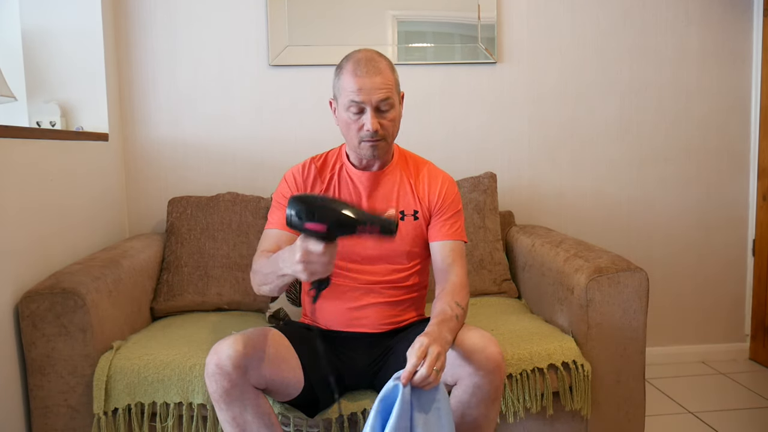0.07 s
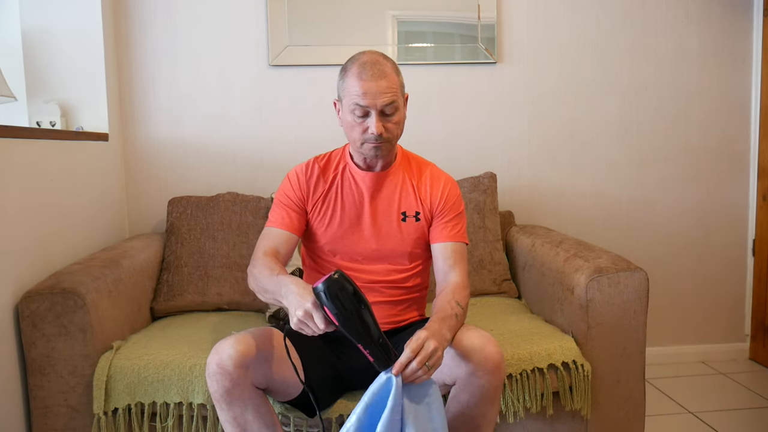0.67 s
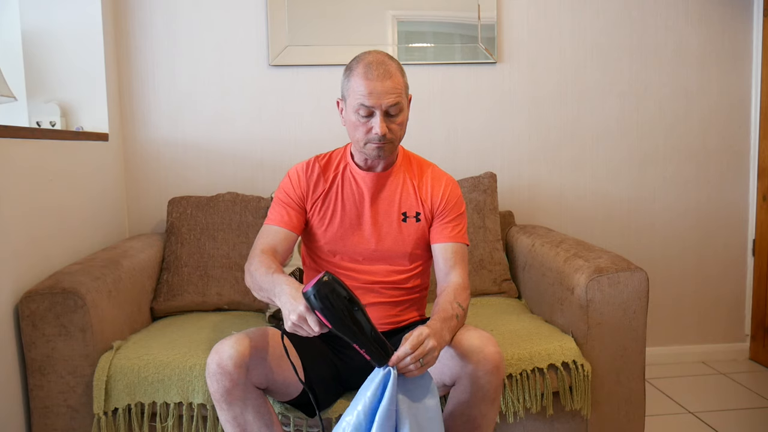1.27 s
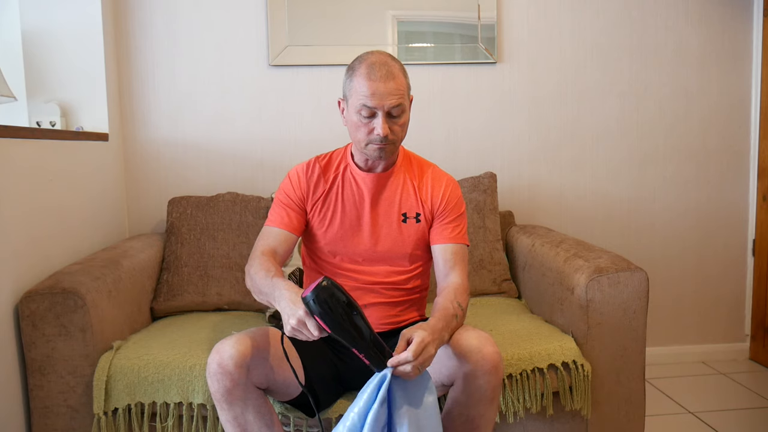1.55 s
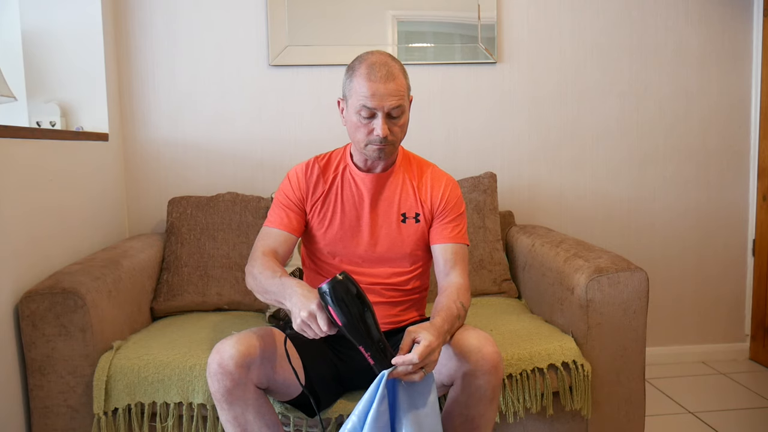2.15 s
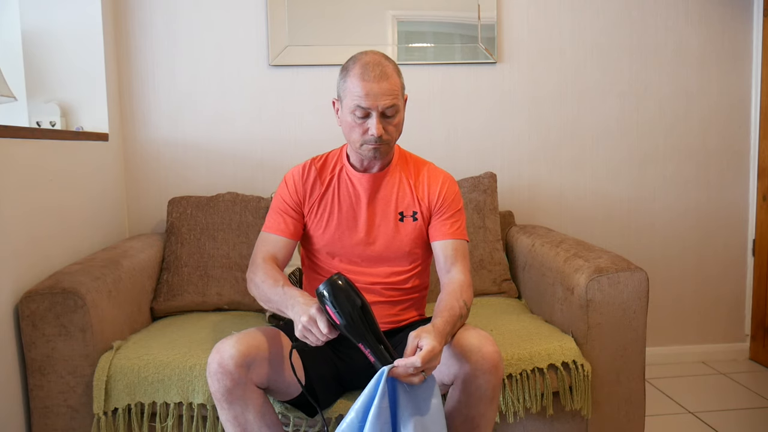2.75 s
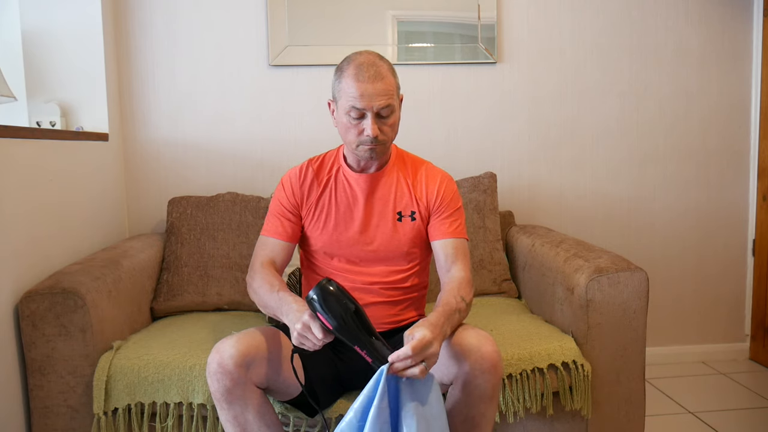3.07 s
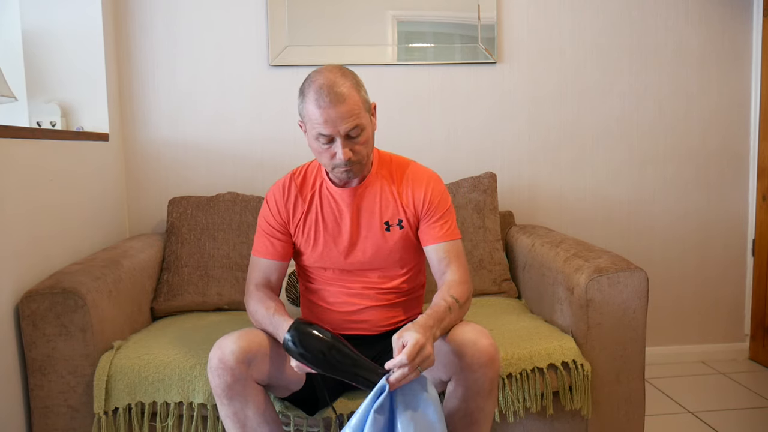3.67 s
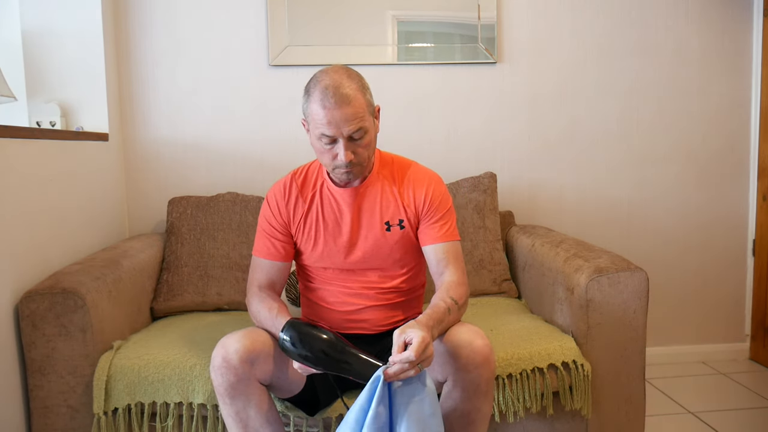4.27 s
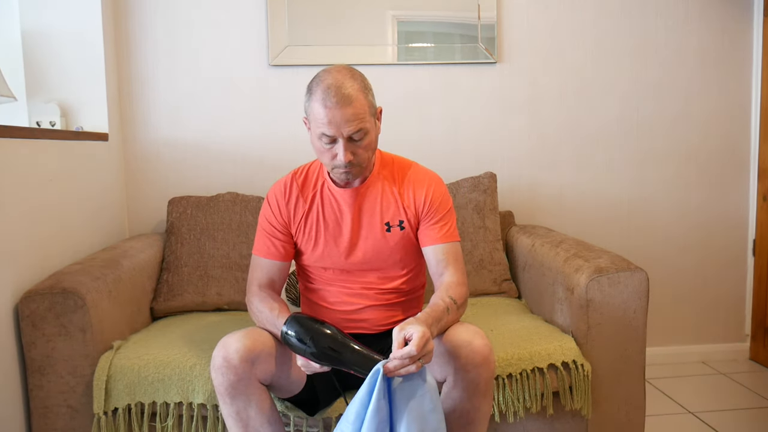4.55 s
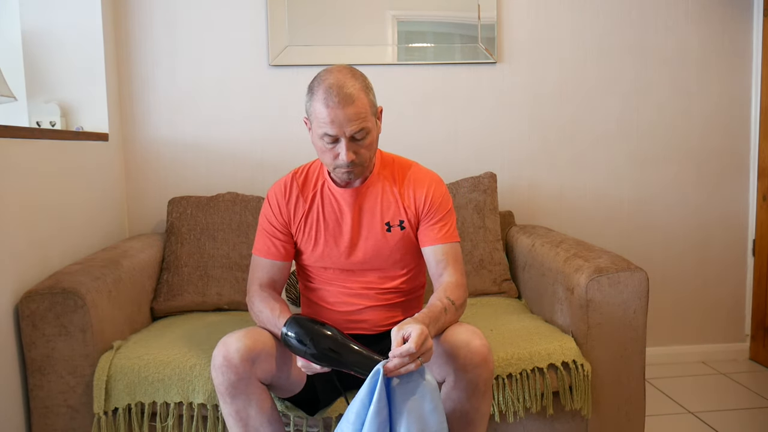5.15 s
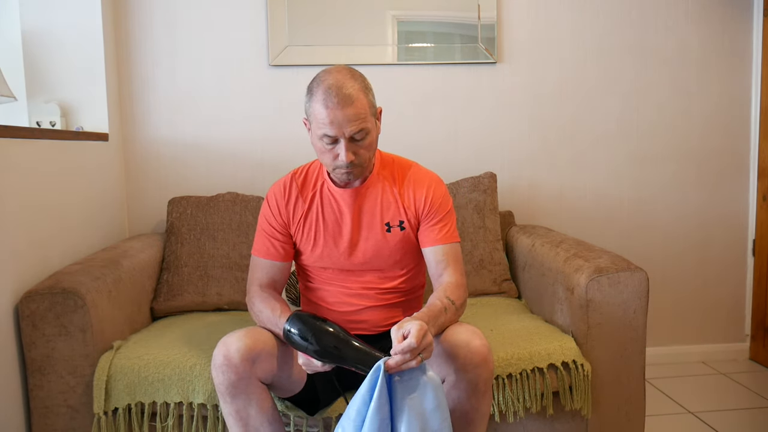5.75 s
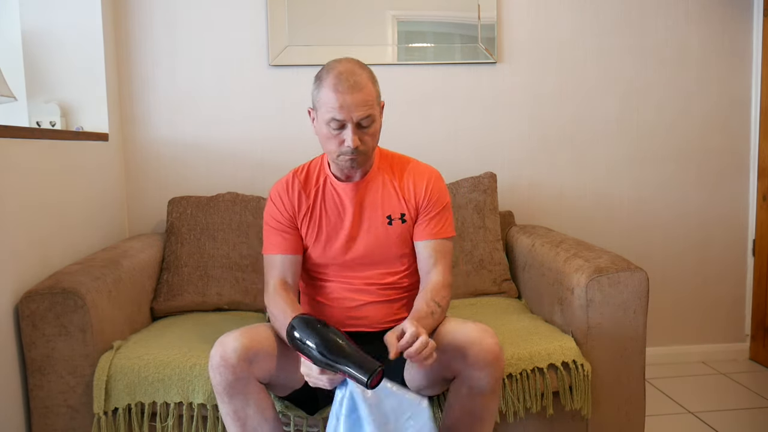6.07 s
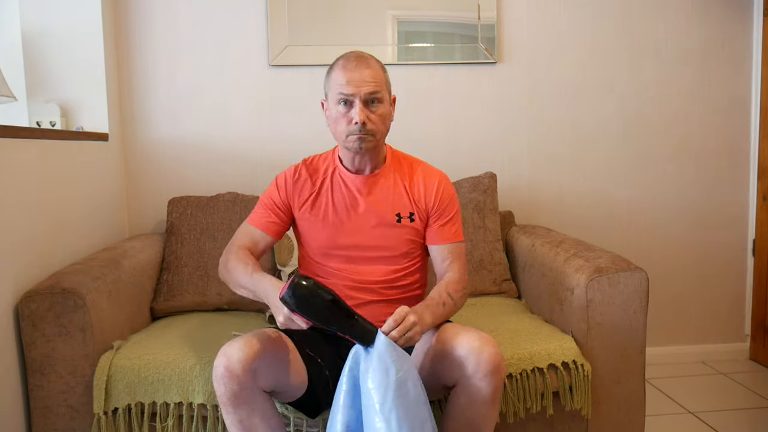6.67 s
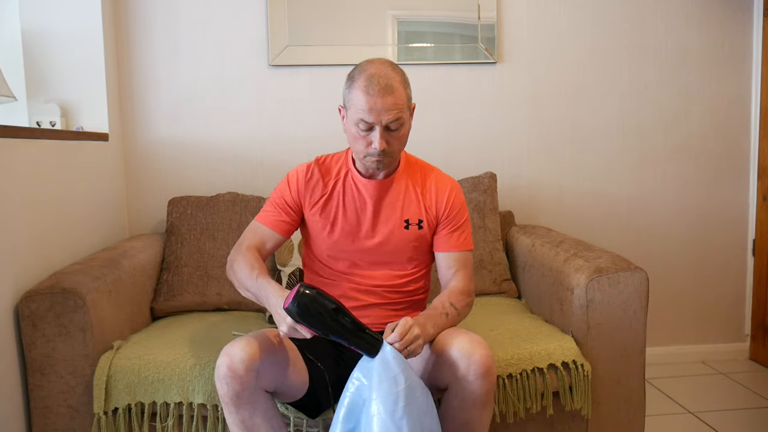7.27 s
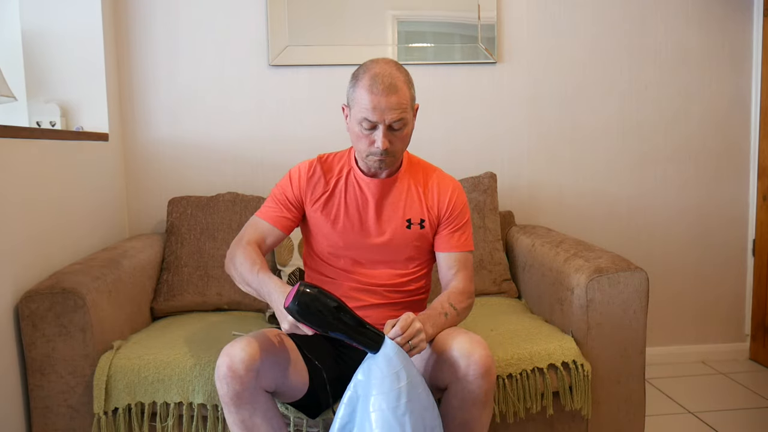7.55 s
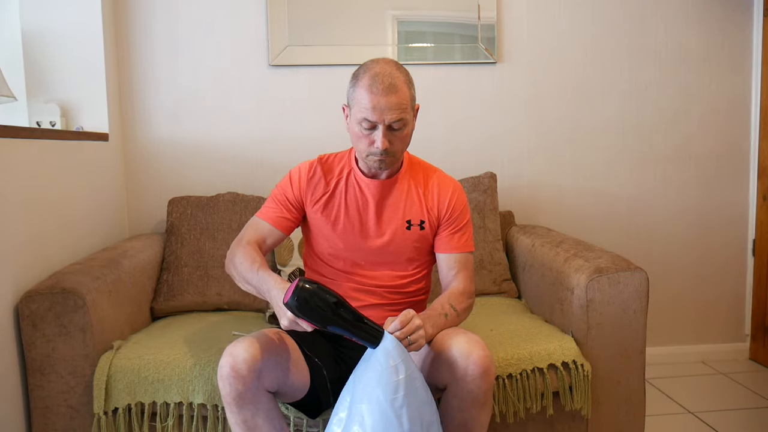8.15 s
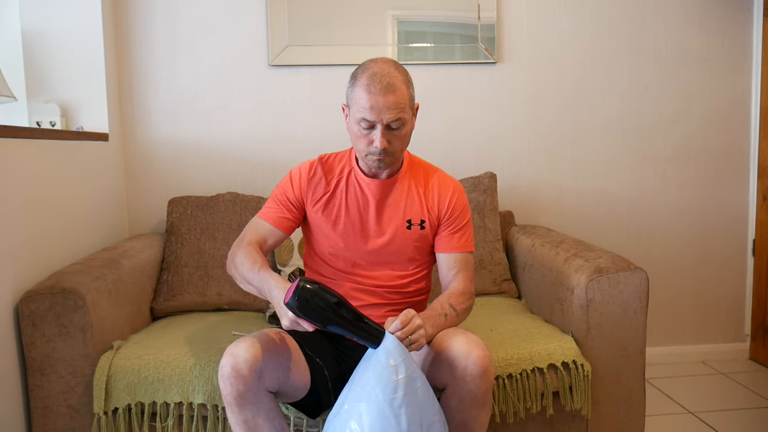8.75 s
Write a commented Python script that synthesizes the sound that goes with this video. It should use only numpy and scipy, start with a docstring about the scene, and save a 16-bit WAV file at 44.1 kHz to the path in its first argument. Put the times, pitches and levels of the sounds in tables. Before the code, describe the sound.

A hair dryer blows into the valve of a limp plastic ball in a living room, heard almost in mono. From the start, air rushes and roars, gushing out when the nozzle slips, while the fan's whine rises over the first two seconds. Dull handling bumps and gusts of rumble come at about 2.2 and 2.7 seconds.

At 3.4 seconds, after a tiny break, the sound switches to fast motion: the air becomes a thinner hiss and the whine jumps much higher, over a faint deep drone and hum. Short plastic crinkles snap at about 3.8, 4.5, 6.3 and 7.2 seconds. The drone slowly fades from 5.4 seconds. Around 6 to 7 seconds the air gushes unevenly and the whine dips and wavers, with a few soft bumps. From about 7.5 seconds the dryer holds a steady high tone until the end, near 9 seconds.

```python
"""A hair dryer blows into the valve of a limp plastic ball in a living room. From the start, air rushes
through the housing, roars on the valve and gushes out when the nozzle slips; the whining fan speeds up
when the nozzle is choked. After 2 s come dull handling bumps and gusts of rumble. At 3.4 s, after a tiny
break, the scene goes on in fast motion: air, fan and rumble sound 3.5 times higher, over a deep drone.
The plastic crinkles now and then, the drone fades from 5.4 s, and the dryer blows on to the end."""
import sys
import numpy as np
from scipy import signal
from scipy.fft import rfft, irfft, next_fast_len
from scipy.io import wavfile
from scipy.ndimage import uniform_filter1d

SR = 44100
rng = np.random.default_rng(int(sys.argv[2]) if len(sys.argv) > 2 else 0)


def put_to_file(sound):
    """Save the sound as 16-bit audio at rate SR, in the file named by the first command-line argument."""
    columns = np.atleast_2d(sound).T  # one column per channel
    safe = np.clip(columns, -1, 1)
    whole_steps = np.round(safe * 32767)
    wavfile.write(sys.argv[1], SR, whole_steps.astype(np.int16))


N = 392931
TIME = np.arange(N) / SR
FREQS_HZ = np.fft.rfftfreq(N, 1 / SR)
FAST_MOTION = 3.5

# Frequencies for air, valve, fan and hums are listed before they are multiplied by `speedup`.
# Tone colour of the rushing air: pitch_hz, level_db
RUSH_NORMAL = [(20.0, -84.0), (60.0, -81.5), (130.0, -71.5), (200.0, -74), (270.0, -67), (450.0, -68),
               (900.0, -66.5), (1800.0, -65), (2200.0, -67.5), (3200.0, -70), (5500.0, -71.5),
               (7300.0, -70.5), (9800.0, -80), (13500.0, -82), (15500.0, -93)]
RUSH_FAST = [(8.0, -89), (25.0, -94), (70.0, -87), (130.0, -78.0), (200.0, -79.5), (270.0, -72.5),
             (450.0, -72), (1200.0, -70), (1850.0, -71.5), (2000.0, -74), (2350.0, -73), (2500.0, -72),
             (3000.0, -75), (4500.0, -77.5)]
# Pitches at which the room, and the dryer's housing and nozzle, ring: pitch_hz, width_hz, boost_db
ROOM_RINGS = [(193, 19.5, 7), (215.4, 11.7, 8.5), (251.6, 10.5, 9), (282.1, 15, 13.5), (310, 23.3, 13),
              (340, 24.5, 10.5), (385.4, 43.4, 12), (417, 13, 4.5), (439.8, 34, 11.5), (470.2, 46.4, 12.5),
              (502, 22.5, 13.5), (552, 99.6, 12), (599, 17.3, 10.5), (650.4, 22.5, 12), (669.8, 20.3, 13.5),
              (716, 18, 10), (728.6, 9.2, 11), (755, 39, 4.4), (774.3, 19, 12), (825.3, 55, 12.5),
              (850, 10, -0.5), (895, 18.5, 10), (939, 21, 10.5)]
HOUSING_RINGS = [(1010, 41, 9.5), (1042, 23, 8), (1104, 67, 11), (1183, 23, 10.5), (1208.5, 40.6, 11.5),
                 (1236, 17, 8), (1277, 39, 11.5), (1331.5, 26.6, 13.5), (1383, 74, 8), (1460, 27, 9.5),
                 (1510, 27, 9.5), (1605, 59, 12), (1694, 18, 12), (1730, 78, 7), (1790, 11.4, 0),
                 (1795, 37, 6.5), (1810, 20.9, 2.5), (1876, 99, 11.5), (2006, 20, 14.5), (2160, 25, -0.5),
                 (2126, 24, 11.5), (2480, 66, 6.5), (2560, 37, 6.5), (2670, 31.8, -2), (2690, 84, 6)]
# The moving nozzle blurs those rings, most in the treble: pitch_hz, sharpness (1 = unblurred)
RING_SHARPNESS = [(600, 1), (670, 1.04), (820, 0.8), (1300, 0.83), (2000, 0.64)]
# The steady leak, fainter when the nozzle sits well: time_s, roar_db, hiss_db
LEAK = [(0, 2, 2.5), (3.3, 2.5, 1.4), (3.95, 2, 1), (4.3, 0, -1.5), (4.5, 1.5, 0.5), (4.7, 2.5, 2.5),
        (5.8, 2, 1), (6.9, 2, 2.3), (7.25, -1, -0.3), (8.9, 1, 1.3)]
# The nozzle slips off and air gushes out: start_s, end_s, release_s, roar_db, hiss_db
GUSHES = [(-.1, 0.154, 0.11, 8, -0.6), (0.216, .8, 0.2, 9, 1.4), (1.68, 1.82, 0.047, 1, 0.5),
          (2.045, 2.273, 0.077, 9, 0.7), (2.634, 3.37, .1, 7.5, 0.3), (3.3, 3.59, 0.25, 7.5, 0.8),
          (5.86, 6.28, 0.095, 7.5, 2), (6.406, 6.61, .06, 8, 2.5), (6.703, 7.0, 0.099, 4.5, 1),
          (7.374, 7.455, 0.09, 3.5, 5)]
# The air pocket between nozzle and valve rings, lower as it closes: time_s, pitch_hz, boost_db
POCKET_NORMAL = [(0, 716, 6), (.5, 800, 0), (2.6, 824, -3.5), (3.35, 814, 9)]
POCKET_FAST = [(3.41, 850, 3.5), (3.6, 780, 2), (3.7, 700, 1), (3.8, 638, 12.5), (4.05, 662, 6.5),
               (4.35, 665, 8), (4.65, 637, 2.5), (5.8, 696, 3), (5.9, 810, -1), (6.05, 850, -1.5),
               (6.249, 815, -2), (6.35, 725, 7), (6.44, 805, 2.5), (6.56, 864, 1), (7.1, 800, -4.5)]
# Narrow bands of the rushing air swell for a moment: start_s, end_s, pitch_hz, boost_db
BREATHY_RINGS = [(.3, .72, 1070, 9), (1.2, 1.358, 2500, 6), (3.3, 3.72, 665, 3), (4.55, 6.05, 2530, 3.5),
                 (4.75, 5.85, 820, 3), (5.98, 6.65, 1950, 3.5), (6.04, 6.28, 656, 5.5),
                 (7.139, 7.26, 510, 4.5), (7.35, 7.47, 820, 7)]
# Fan speed, higher when the nozzle is choked: time_s, turns_per_s
FAN_SPEED_NORMAL = [(0, 229), (.31, 268), (.82, 284), (1.08, 302.5), (1.4, 315), (1.96, 321), (2.26, 296),
                    (2.58, 313), (2.81, 298), (3.35, 289)]
FAN_SPEED_FAST = [(3.41, 281), (3.65, 287), (3.84, 246), (4.3, 264), (4.55, 262), (4.7, 311), (5.62, 312.5),
                  (5.85, 309), (5.95, 282), (6.12, 270), (6.25, 275), (6.37, 248), (6.5, 272), (6.62, 278),
                  (6.68, 295), (6.9, 295), (7.1, 300), (7.21, 323), (7.35, 324), (7.47, 305), (7.62, 315.5),
                  (7.8, 318.8), (8.89, 318)]
# The tone of the fan's shaft grows with speed: turns_per_s, level_db
SHAFT_LEVELS = [(230, -47), (250, -47), (268, -47.5), (280, -39.5), (295, -36.5), (311, -35.5), (320, -36)]
# As the dryer is turned, one fan tone sings out or fades: tone_name, start_s, end_s, change_db
FAN_WHINES = [("shaft", 0.17, 0.3, 7.6), ("shaft", 0.9, 1, 4), ("blades", .92, 1.45, 7.6),
              ("shaft", 2.16, 2.48, -3), ("fourth", 4.2, 4.5, 5.5), ("shaft", 4.22, 4.56, -7),
              ("third", 4.75, 5.8, 4.1), ("blades", 5.95, 6.28, 14), ("shaft", 6.28, 6.58, -3.5),
              ("blades", 6.68, 7.12, 17.7), ("third", 6.65, 7.0, 5), ("shaft", 6.88, 7.13, -9),
              ("blades", 7.12, 9.1, 11), ("fourth", 7.56, 9.1, 15.7)]
# Steady low hums: pitch_hz, level_db
HUMS_NORMAL = [(100, -62.5)]
HUMS_FAST = [(43.1, -72.5), (98.5, -66)]
# Gusts of deep rumble: start_s, end_s, boost_db
RUMBLE_GUSTS = [(2.14, 2.35, 14), (2.55, 3.03, 18.5), (3.3, 3.8, 13), (5.85, 6.02, 19), (6.95, 7.5, 8.5)]
# Dull handling bumps: start_s, level_db, pitch_hz
BUMPS = [(2.18, -43, 65), (2.72, -40, 130), (6.08, -57, 200), (6.32, -57, 200), (6.56, -52, 170)]
# Crinkles of the ball's plastic skin: start_s, level_db, pitch_hz
CRINKLES = [(3.774, -29, 2560), (4.310, -41, 4500), (4.518, -33, 4500), (6.232, -27, 4000),
            (6.381, -23, 4000), (7.177, -27, 2200)]
# Strength of the echoes that make left and right differ: pitch_hz, gain_db
WIDTH_NORMAL = [(60, -16), (140, -21), (350, -29), (700, -38.5), (1400, -33.5), (2800, -23.5),
                (5600, -19.5), (12000, -18.5)]
WIDTH_FAST = [(60, -26), (140, -17), (350, -24), (700, -18), (1400, -55), (2800, -58), (5600, -43.5),
              (12000, -21.5)]


def amp(db):
    """Turns decibels into a factor to multiply by."""
    return 10 ** (np.asarray(db) / 20)


def unit(x):
    """Scales a signal to an average strength (rms) of 1."""
    return x / np.sqrt(np.mean(x ** 2) + 1e-20)


def at_pitch(rows, hz):
    """Reads a table between its rows, along a scale of octaves."""
    row_hz, values = np.transpose(rows)
    return np.interp(np.log(hz + 1), np.log(row_hz + 1), values)


def at_time(rows, t):
    """Reads each column of a table at the times t."""
    time_s, *columns = np.transpose(rows)
    return [np.interp(t, time_s, column) for column in columns]


def colour(x, gain):
    """Filters x with one gain for each of FREQS_HZ."""
    size = next_fast_len(N)
    gain = np.interp(np.fft.rfftfreq(size, 1 / SR), FREQS_HZ, gain)
    return irfft(rfft(x, size) * gain, size)[:N]


def drift(rate_hz, step=32):
    """A random wobble, up to about rate_hz fast."""
    size = next_fast_len(N // step + 2)
    keep_slow = np.exp(-(np.fft.rfftfreq(size, step / SR) / rate_hz) ** 2)
    wobble = irfft(rfft(rng.standard_normal(size)) * keep_slow, size)
    return np.interp(np.arange(N) / step, np.arange(size), unit(wobble))


def hump(hz, centre_hz, octaves):
    """A bell shape of height 1 around one pitch."""
    return np.exp(-(np.log2(hz / centre_hz) / octaves) ** 2)


def held(t, start, end, fade_s):
    """Rises to 1 around start, holds, and falls around end."""
    return np.clip(np.minimum(t - start, end - t) / fade_s + 1 / 2, 0, 1)


def swells(rows, t, fade_s):
    """Adds up held changes of level, in dB."""
    return sum(db * held(t, start, end, fade_s) for start, end, db in rows)


def ringing(hz, ripple_db=1.62):
    """Boost in dB as housing and room ring; crowded echoes add a fine ripple higher up."""
    peaks = sum(db * np.exp(-(2 * (hz - pitch_hz) / width_hz) ** 2)
                for pitch_hz, width_hz, db in ROOM_RINGS + HOUSING_RINGS)
    grid_hz = np.arange(0, SR / 2, 9)
    ripple = np.interp(hz, grid_hz, rng.standard_normal(len(grid_hz)))
    return peaks + ripple_db * ripple * np.clip(hz / 1800, 0, 1.3) ** 2


def air_rush(spectrum, speedup, ring_share):
    """Swirling air makes a noise that sets housing and room ringing."""
    hz = np.arange(0, SR / 2 / speedup)
    sharp_db = ringing(hz)
    blurred_db = uniform_filter1d(sharp_db, size=100)
    sharpness = ring_share * at_pitch(RING_SHARPNESS, hz)
    level_db = at_pitch(spectrum, hz) + blurred_db + sharpness * (sharp_db - blurred_db)
    noise = rng.standard_normal(N) * np.sqrt(SR / 2)
    return colour(noise, np.interp(FREQS_HZ / speedup, hz, amp(level_db)))


def gushes(t, attack_s=0.072):
    """Extra roar and hiss in dB: a gap opens quickly, holds, and closes as the nozzle settles back."""
    roar = hiss = 0
    for start, end, release_s, roar_db, hiss_db in GUSHES:
        opening = np.clip((t - start) / attack_s + 1 / 2, 0, 1)
        gap = opening * np.exp(-np.maximum(t - end, 0) / release_s)
        roar += gap * (roar_db - roar)
        hiss += gap * (hiss_db - hiss)
    return roar, hiss


def valve(hz, pocket_hz, pocket_db, gush_db, overtone_spacing=0.57):
    """Boost in dB: the air pocket at the valve rings, with overtones while air gushes."""
    ring = hump(hz, pocket_hz, octaves=0.1)
    dip_above = 0.73 * hump(hz, 1.197 * pocket_hz, octaves=0.1)
    overtones = np.cos(2 * np.pi * (hz / pocket_hz - 1) / overtone_spacing)
    overtones *= hump(hz, 2 * pocket_hz, octaves=0.63)
    return pocket_db * (ring - dip_above) + 0.11 * gush_db * overtones


def air_jet(rush, fan_speeds, pocket, speedup, gain_db, flow_power, gush_share, roar_octaves, hiss_hz):
    """The rush grows with fan speed, roars on the valve's rim and hisses through the gap."""
    hz, t, slices = signal.stft(rush, SR, nperseg=512)  # the spectrum, moment by moment
    hz = hz[:, None] / speedup + 1
    gush_db, gush_hiss_db = gushes(t)
    leak_db, leak_hiss_db = at_time(LEAK, t)
    pocket_hz, pocket_db = at_time(pocket, t)
    flow = at_time(fan_speeds, t)[0] / 310  # 1 at the fan's rated speed
    flow_db = gain_db + flow_power * 20 * np.log10(flow) + gush_share * gush_db
    roar_db = (leak_db + gush_db) * hump(hz, 0.9 * pocket_hz, roar_octaves)
    hiss_db = (leak_hiss_db + gush_hiss_db) * np.clip(np.log2(hz / hiss_hz), 0, 1)
    valve_db = valve(hz, pocket_hz, pocket_db, gush_db)
    breathy_db = sum(db * held(t, start, end, fade_s=0.08) * hump(hz, pitch_hz, octaves=0.056)
                     for start, end, pitch_hz, db in BREATHY_RINGS)
    slices *= amp(flow_db + roar_db + hiss_db + valve_db + breathy_db)
    jet = signal.istft(slices, SR, nperseg=512)[1][:N]
    flutter_db = 0.5 * drift(rate_hz=36)
    return jet * amp(flutter_db)


def fan(fan_speeds, speedup, gain_db, second_db, fourth_db, blades_db, jitter, waver_db, gush_share):
    """The shaft and its nine blades sing at multiples of the turning rate, wavering most in gushes."""
    turn_rate = at_time(fan_speeds, TIME)[0]
    turns = np.cumsum(speedup * turn_rate * (1 + jitter * drift(12 * speedup))) / SR
    shaft_db = gain_db + at_pitch(SHAFT_LEVELS, turn_rate)
    unsteady_db = waver_db + gush_share * gushes(TIME)[0]
    tones = [("shaft", 1, shaft_db), ("second", 2, shaft_db + second_db), ("third", 3, shaft_db - 7),
             ("fourth", 4, fourth_db), ("blades", 9, blades_db)]
    sound = 0
    for name, cycles_per_turn, base_db in tones:
        whine_db = swells([row[1:] for row in FAN_WHINES if row[0] == name], TIME, fade_s=0.09)
        level_db = base_db + whine_db + unsteady_db * drift(4 * speedup)
        sound += amp(level_db) * np.sin(2 * np.pi * cycles_per_turn * turns)
    return np.sqrt(2) * sound


def rumble_and_hum(hums, speedup, rest_db, width_hz, centre_hz=24):
    """A deep rumble swells in gusts over faint, steady hums."""
    band = 1 / (1 + ((FREQS_HZ / speedup - centre_hz) / width_hz) ** 2)
    rumble = unit(colour(rng.standard_normal(N), band))
    rumble_db = rest_db + swells(RUMBLE_GUSTS, TIME, fade_s=0.15)
    hum = sum(amp(db) * np.sin(2 * np.pi * hz * speedup * TIME) for hz, db in hums)
    return amp(rumble_db) * rumble + np.sqrt(2) * hum


def knocks(rows, decay_s):
    """Handling bumps or snaps of plastic: each is a burst of noise that dies away at once."""
    sound, t = np.zeros(N), np.arange(SR // 4) / SR
    for start_s, level_db, hz in rows:
        band = signal.butter(2, [hz / 2, hz * np.sqrt(2)], "bandpass", fs=SR, output="sos")
        noise = unit(signal.sosfilt(band, rng.standard_normal(len(t))))
        sound[round(start_s * SR):][:len(t)] += amp(level_db) * noise * np.exp(-t / decay_s)
    return sound


def drone(pitch_hz=59.2, start_db=-60, fade_from_s=5.4, fade_db_per_s=5.5):
    """A deep tone that holds, then slowly fades."""
    level_db = start_db - fade_db_per_s * np.maximum(TIME - fade_from_s, 0)
    return np.sqrt(2) * amp(level_db) * np.sin(2 * np.pi * pitch_hz * TIME)


def widen(sound, width, decay_s=0.018):
    """Scattered echoes reach left and right a little differently."""
    t = np.arange(SR // 20) / SR
    scatter = rng.standard_normal(len(t)) * np.exp(-t / decay_s)
    echoes = signal.oaconvolve(sound, scatter / np.linalg.norm(scatter))[:N]
    side = colour(echoes, amp(at_pitch(width, FREQS_HZ)))
    return np.array([sound + side, sound - side])


def scene():
    """The dryer at normal speed, a moment of silence, then in fast motion; almost mono."""
    bumps = knocks(BUMPS, decay_s=0.061)  # heard in both parts

    rush = air_rush(RUSH_NORMAL, speedup=1, ring_share=0.91)
    normal = air_jet(rush, FAN_SPEED_NORMAL, POCKET_NORMAL, speedup=1, gain_db=-0.4,
                     flow_power=1.6, gush_share=0.21, roar_octaves=0.56, hiss_hz=1250)
    normal += fan(FAN_SPEED_NORMAL, speedup=1, gain_db=0.5, second_db=-22, fourth_db=-46,
                  blades_db=-44.5, jitter=0.00278, waver_db=1.5, gush_share=0.13)
    normal += rumble_and_hum(HUMS_NORMAL, speedup=0.95, rest_db=-63, width_hz=6) + bumps

    rush = air_rush(RUSH_FAST, FAST_MOTION, ring_share=0.99)
    fast = air_jet(rush, FAN_SPEED_FAST, POCKET_FAST, FAST_MOTION, gain_db=-1.5,
                   flow_power=1.68, gush_share=0.37, roar_octaves=0.44, hiss_hz=1200)
    fast += fan(FAN_SPEED_FAST, FAST_MOTION, gain_db=0, second_db=-12, fourth_db=-50.5,
                blades_db=-56, jitter=0.00129, waver_db=1.43, gush_share=0.12)
    fast += rumble_and_hum(HUMS_FAST, FAST_MOTION, rest_db=-69, width_hz=3.6)
    fast += drone() + knocks(CRINKLES, decay_s=0.0043) + bumps

    normal_end_s, fast_start_s, fade_s = 3.368, 3.394, 0.005
    fade_out = np.clip((normal_end_s - TIME) / fade_s + 1 / 2, 0, 1)
    fade_in = np.clip((TIME - fast_start_s) / fade_s, 0, 1)
    return widen(normal, WIDTH_NORMAL) * fade_out + widen(fast, WIDTH_FAST) * fade_in


def record(dry):
    """Cuts away the very highest treble."""
    lowpass = signal.firwin(511, cutoff=15950, window=("kaiser", 9), fs=SR)
    return signal.oaconvolve(dry, lowpass[None], "same")


dry = scene()
out = record(dry)
put_to_file(out)
```